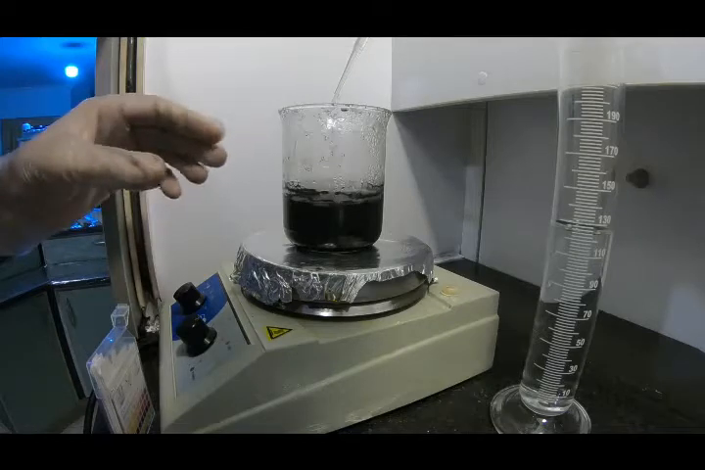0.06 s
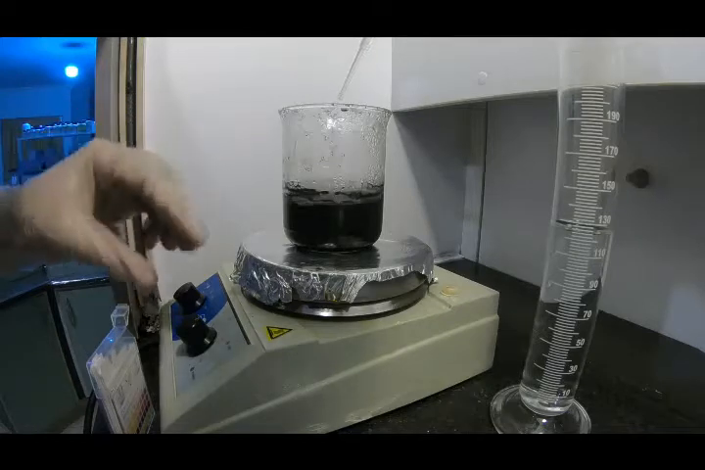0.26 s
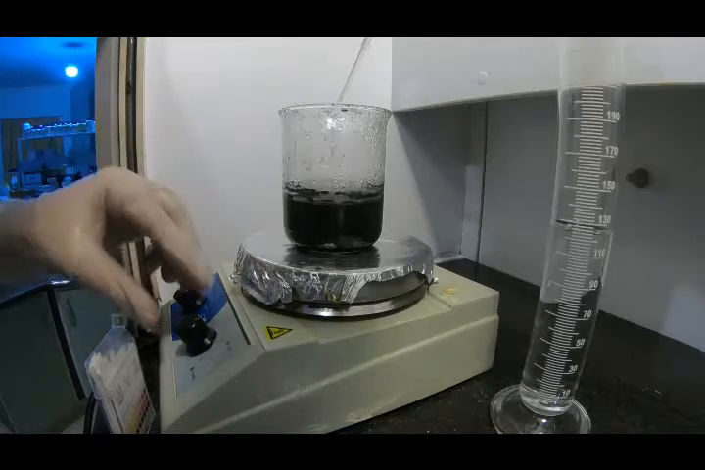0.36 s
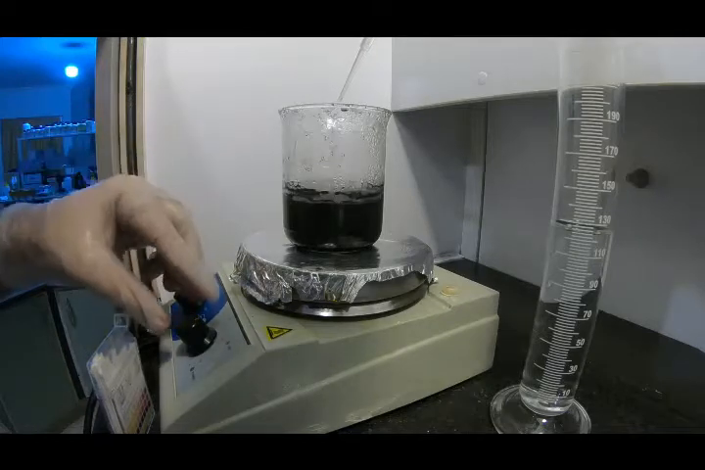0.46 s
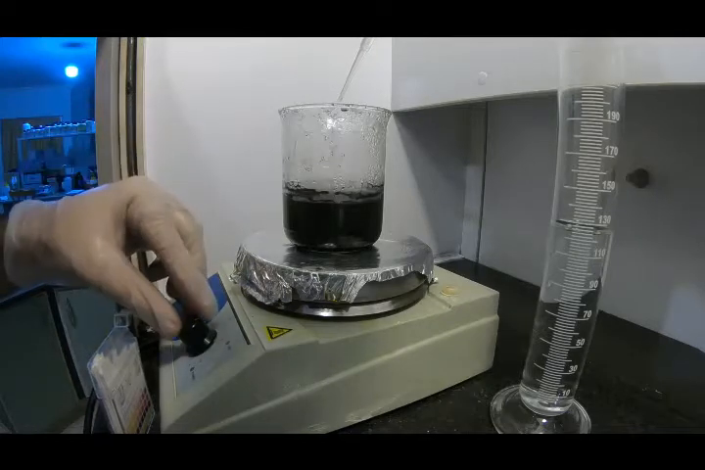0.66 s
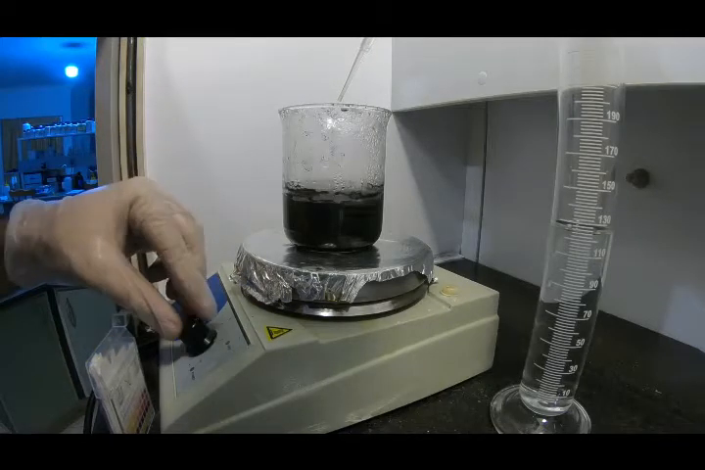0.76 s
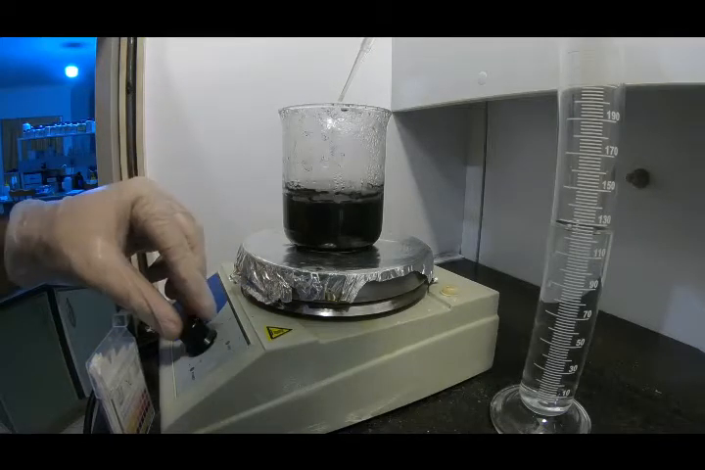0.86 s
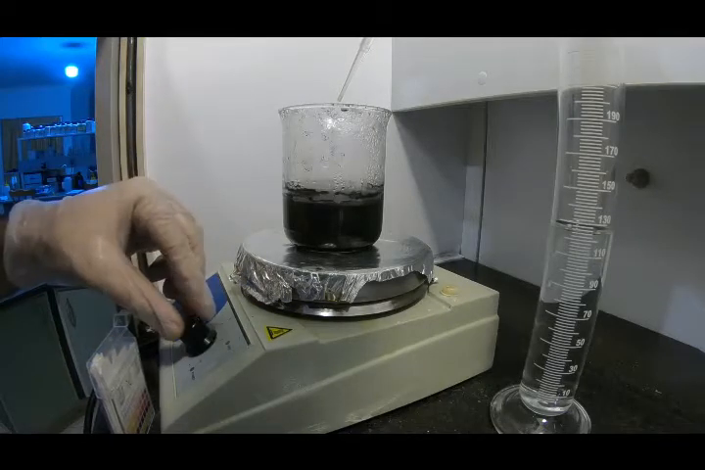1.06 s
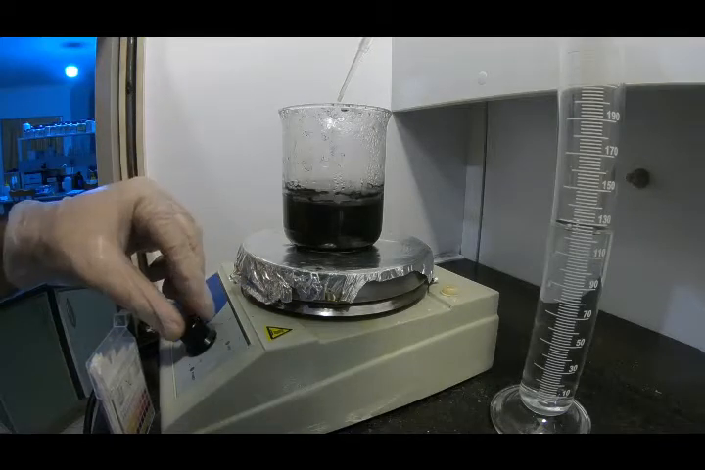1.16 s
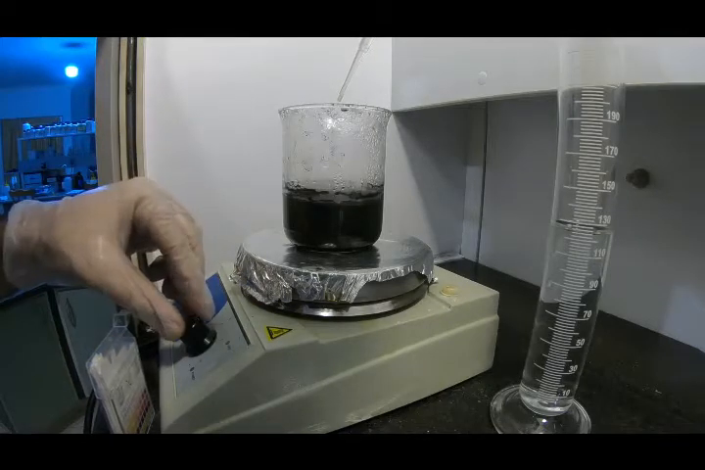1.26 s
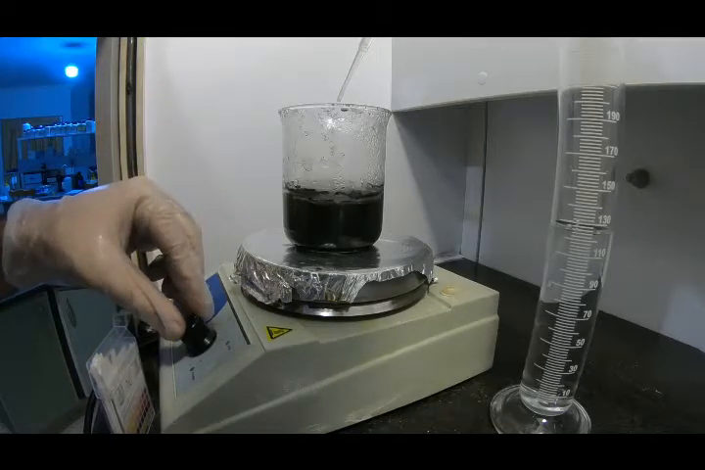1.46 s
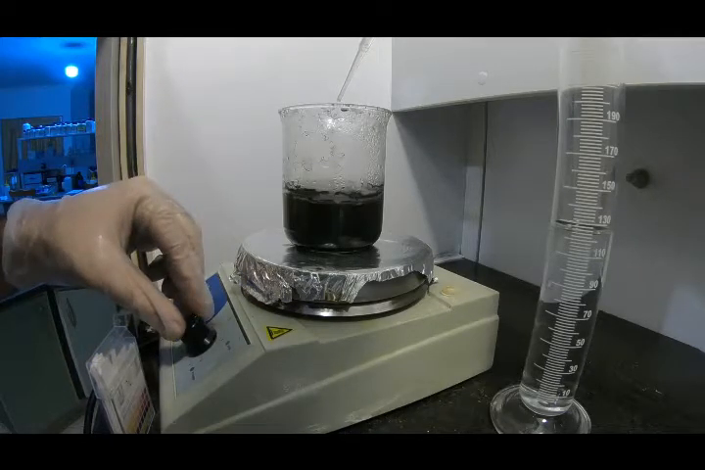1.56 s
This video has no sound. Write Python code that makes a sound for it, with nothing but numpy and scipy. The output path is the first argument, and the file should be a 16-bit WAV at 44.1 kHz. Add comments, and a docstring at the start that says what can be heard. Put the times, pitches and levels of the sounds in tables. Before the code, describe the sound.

A stirring bar clinks irregularly against a glass beaker on a hotplate stirrer. Scattered short, bright ticks open, with a stronger knock near 0.45 s and another at 0.6. After lighter taps, the loudest sharp clatter comes at 0.84-1.0 s with a brief hiss and plate rattle. From 1.13 s dull small clunks and thin high tinks fade, nearly still by 1.5 s, over faint wavering hum, rumble and close room air.

```python
"""Stirring bar tumbling in a glass beaker

A stirring bar tumbles in a glass beaker on a foil-covered stirrer hotplate: it ticks and clinks on the glass
and rattles between the blows, shaking the plate. Blows are decaying sines plus dense noise; the rattle is noise
shaped by many small touches; the plate rings as resonant noise and, when jolted, as decaying sines.
A low wavering hum, a faint steady tone, rumble and room air fill the small lab corner as coloured noise and a sine.
"""
import sys
import numpy as np
from scipy import signal
from scipy.fft import rfft, irfft, next_fast_len
from scipy.io import wavfile
from scipy.ndimage import uniform_filter1d

SR = 44100
rng = np.random.default_rng(int(sys.argv[2]) if len(sys.argv) > 2 else 0)


def file_out(sig):
    """Save sig as 16-bit WAV at sys.argv[1]."""
    # one column per channel
    cols = np.atleast_2d(sig).T
    # limit, then scale
    lim = np.clip(cols, -1, 1)
    pcm = np.round(lim * 32767).astype(np.int16)
    wavfile.write(sys.argv[1], SR, pcm)


def voltage_ratio(decibels):
    """Convert decibels (scalar or array-like) to amplitude ratios, 20 dB per decade."""
    exponent = np.asarray(decibels, float) / 20
    return 10 ** exponent


N = 70560

# modes of the beaker: pitch_hz [Hz], relative_db [dB], t60_s [s, limited and stretched in each blow]
GLASS_MODES = [(1703,-7,0.2), (2200,-6.5,0.097), (2710,4.5,0.051), (2900,4.5,0.14), (3327,2.5,0.1),
               (3500,4.5,0.067), (3803,-2,0.081), (4233,2.5,0.053), (4560,-45,0.027), (4380,-2,0.091),
               (4910,3.5,0.45), (5213,8,0.21), (5430,3,0.16), (5825,-7,0.2), (6370,-6.5,0.22),
               (6490,-1.5,0.091), (6690,5.5,0.04), (7220,-21,0.11), (7334,-1,0.058), (7670,-2.5,0.083)]
# colour of the dense unresolved modes of glass, foil and plate: pitch_hz [Hz], relative_density_db [dB per Hz]
CLATTER_COLOUR = [(710, -101), (1300, 1), (1690, -4.5), (2410, -8.5), (3280, -4.5), (3650, -11),
                  (5040, -0.5), (5490, -1), (6580, 1.5), (7650, -3.5), (8700, -17), (15500, -56)]
# plate resonances: pitch_hz [Hz], width_hz [Hz], relative_db [dB]; the steady ring squares their response
PLATE_MODES = [(804, 50, -1.5), (853.4, 41, -6.5), (920.4, 26, -1.5), (1192, 39, -3.5), (549, 93, -8)]
# left-right likeness by pitch: pitch_hz [Hz], correlation [-1 to 1]
STEREO_LIKENESS = [(60, -0.15), (140, -0.28), (640, -0.25), (1400, -0.19), (3100, 0.65), (5000, 0.4),
                   (7000, -0.13), (9000, -0.15), (15000, -0.28)]

LOWER_HZ, UPPER_HZ = 3650, 5500  # borders of the lower, middle and upper glass modes
RISE_S = 0.0025  # time constant of the onset of blows, touches, ticks and clunks
MODE_SPLIT_HZ = 52.6  # scatter of the beat rate in a blow; width of the glass resonances in the rattle
MODE_SCATTER_DB = 2.5  # how unevenly single modes are struck


def unit(x):
    """Scale to rms 1."""
    return x / np.sqrt(np.mean(x ** 2) + 1e-20)


def along(points, hz):
    """Read (Hz, value) points on a log frequency axis."""
    point_hz, value = np.transpose(points)
    return np.interp(np.log(hz + 1), np.log(point_hz + 1), value)


def level(rows):
    """Gain per sample from (s, dB) rows, gliding in dB."""
    time_s, db = np.transpose(rows)
    return voltage_ratio(np.interp(np.arange(N) / SR, time_s, db))


def colour(points):
    """Response that follows (Hz, dB) points."""
    return lambda hz: voltage_ratio(along(points, hz))


def bands(peaks):
    """Response of (Hz, width Hz, dB) resonances, summed with alternating sign."""
    def response(f):
        total = 0
        for k, (centre, width, db) in enumerate(peaks):
            damping = 1j * f * width
            total = total + (-1) ** k * voltage_ratio(db) * damping / (centre ** 2 - f ** 2 + damping)
        return total
    return response


def noise(n, response):
    """Two channels of coloured noise, rms 1, as alike as the microphone ports hear that pitch."""
    m = next_fast_len(n)
    hz = np.fft.rfftfreq(m, 1 / SR)
    turn = np.arccos(np.clip(along(STEREO_LIKENESS, hz), -1, 1)) / 2
    spectrum = rfft(rng.standard_normal((2, m))) * response(hz)
    mid, side = irfft(spectrum * [np.cos(turn), np.sin(turn)], m)[:, :n]
    return unit(np.array([mid + side, mid - side]))


def steep_noise(peaks):
    """Resonant noise with the response squared: narrower peaks, steeper skirts, dB differences doubled."""
    return noise(N, lambda hz: bands(peaks)(hz) ** 2)


def hum():
    """Low hum: resonant noise that wavers in level."""
    # course of the hum: time_s [s], level_db [dB]
    hum_level = [(0.03, -49.5), (0.132, -65.5), (0.444, -47.5), (0.734, -63.5), (0.992, -50), (1.564, -57)]
    # resonances before squaring: pitch_hz [Hz], width_hz [Hz], relative_db [dB]
    hum_band = [(144.6, 14.5, -3), (170.2, 36.7, -4.5), (201.6, 30, -8)]
    return level(hum_level) * steep_noise(hum_band)


def low_tone():
    """A faint steady sine, the same in both channels."""
    tone_hz, tone_db = 63.6, -66.5
    return voltage_ratio(tone_db) * np.sin(2 * np.pi * tone_hz * np.arange(N) / SR)


def rumble():
    """Low rumble: noise limited to the bass."""
    # course of the rumble: time_s [s], level_db [dB]
    rumble_level = [(0.0, -64), (0.61, -64), (0.992, -54), (1.6, -73)]
    # its colour: pitch_hz [Hz], relative_density_db [dB per Hz]
    rumble_colour = [(20, -10), (45, -5), (60, -4.5), (80, -1), (95, -13.5), (110, -48), (200, -120)]
    return level(rumble_level) * noise(N, colour(rumble_colour))


def room_air():
    """Room air: broad noise with most of its strength in the low range."""
    # course of the air: time_s [s], level_db [dB]
    air_level = [(0.0, -55), (0.966, -55.5), (1.6, -57.5)]
    # its colour: pitch_hz [Hz], relative_density_db [dB per Hz]
    air_colour = [(60, -49), (120, -5.5), (200, -2.5), (268, -8.5), (534, -12.5), (690, -20.5),
                  (800, -10.5), (1150, -18.5), (3750, -32.5), (6020, -21), (15500, -58.5)]
    return level(air_level) * noise(N, colour(air_colour))


def plate_ring():
    """The shaken plate rings in its low resonances, as narrow-band noise that swells and falls."""
    # course of the ring: time_s [s], level_db [dB]
    shake = [(0.0, -60), (0.106, -64.5), (0.48, -48.5), (0.516, -62), (1.03, -50.5), (1.1, -64.5),
             (1.2, -54), (1.6, -79)]
    return level(shake) * steep_noise(PLATE_MODES)


def jolts():
    """Each jolt sets the plate's low modes ringing as decaying sines."""
    # jolts of the plate: start_s [s], level_db [dB, before the mode's own level]
    jolt_rows = [(0.017, -52.5), (0.059, -57), (0.293, -51.5), (0.377, -46.5), (0.405, -68), (0.455, -50),
                 (0.598, -46.5), (0.67, -52), (0.71, -50.5), (0.762, -49), (0.825, -49), (0.895, -56),
                 (0.959, -44.5), (1.01, -52.5), (1.049, -66)]
    top_hz = 1000  # a jolt wakes only the plate modes under this
    rise_s, t60_s = 0.0018, 0.19
    out = np.zeros((2, N + SR))
    t = np.arange(SR // 4) / SR
    woken = [mode for mode in PLATE_MODES if mode[0] < top_hz]
    hz, _, mode_db = (column[:, None] for column in np.transpose(woken))
    turn = np.arccos(np.clip(along(STEREO_LIKENESS, hz), -1, 1)) / 2
    for start_s, db in jolt_rows:
        scatter, phase = rng.standard_normal((2, len(hz), 1))
        fade = voltage_ratio(db + mode_db + MODE_SCATTER_DB * scatter - 60 * t / t60_s)
        fade = fade * (1 - np.exp(-t / rise_s))
        wave = 2 * np.pi * hz * t + 9 * phase
        ring = [(fade * np.sin(wave + side * turn)).sum(0) for side in (1, -1)]
        out[:, round(start_s * SR):][:, :len(t)] += ring
    return out[:, :N]


def hit(start_s, db, t60_s):
    """Gain of one light hit: quick rise, then an exponential fall."""
    since = (np.arange(N) / SR - start_s).clip(0)
    return voltage_ratio(db - 60 * since / t60_s) * (1 - np.exp(-since / RISE_S))


def clunks():
    """Dull clunks wake a broad low ring of resonant noise."""
    # clunks: start_s [s], level_db [dB]
    clunk_rows = [(1.143, -45.5), (1.161, -46.5), (1.186, -50.5), (1.206, -53), (1.253, -49.5),
                  (1.293, -56)]
    # resonances before squaring: pitch_hz [Hz], width_hz [Hz], relative_db [dB]
    clunk_band = [(814, 125, 0), (1195, 250, 0.0052)]
    t60_s = 0.13
    return sum(hit(start_s, db, t60_s) for start_s, db in clunk_rows) * steep_noise(clunk_band)


def tinks():
    """Late light ticks wake only a thin ring of resonant noise near 6 kHz."""
    # ticks: start_s [s], level_db [dB], t60_s [s]
    tink_rows = [(1.167,-49,0.18), (1.18,-30,0.062), (1.198,-50,0.14), (1.234,-43,0.08), (1.249,-34,0.031),
                 (1.293,-52.5,0.19), (1.327,-57.5,0.23), (1.412,-50,0.15), (1.516,-47,0.13)]
    # resonances before squaring: pitch_hz [Hz], width_hz [Hz], relative_db [dB]
    tink_band = [(6150, 380, 0), (5800, 500, -3)]
    return sum(hit(*row) for row in tink_rows) * steep_noise(tink_band)


def sizzle():
    """Treble hiss that surges briefly."""
    # course of the hiss: time_s [s], level_db [dB]
    sizzle_level = [(0.0, -103), (0.48, -62.5), (0.508, -111), (0.828, -97), (0.846, -51), (1.278, -103),
                    (1.6, -86)]
    # its colour: pitch_hz [Hz], relative_density_db [dB per Hz]
    sizzle_colour = [(5000, -20), (8500, -11), (11000, -15.5), (13600, -19), (15800, -32)]
    return level(sizzle_level) * noise(N, colour(sizzle_colour))


def rattle():
    """Many small uneven touches between the blows shape noise in the clatter and the higher glass modes."""
    # course of the rattle: time_s [s], level_db [dB, of the clatter; the glass ring adds to it]
    rattle_level = [(0.0, -60.5), (0.382, -50), (0.69, -63), (0.824, -46.5), (1.04, -48.5), (1.15, -55),
                    (1.38, -63), (1.6, -86)]
    touches_per_s, scatter_db, t60_s = 220, 15, 0.045
    ring_db = -11  # glass ring against clatter
    place, strength = rng.random((int(touches_per_s * N / SR), 2)).T
    kicks = np.bincount((place * N).astype(int), voltage_ratio(scatter_db * strength), N)
    t = np.arange(SR // 5) / SR
    power_fade = voltage_ratio(-120 * t / t60_s) * (1 - np.exp(-t / RISE_S))
    # the touches add up in power; the root gives the gain
    power = signal.fftconvolve(kicks, power_fade)[:N]
    shape = unit(np.sqrt(np.abs(power)))
    peaks = [(hz, MODE_SPLIT_HZ, db) for hz, db, _ in GLASS_MODES if hz > LOWER_HZ]
    body = noise(N, colour(CLATTER_COLOUR)) + voltage_ratio(ring_db) * noise(N, bands(peaks))
    return shape * level(rattle_level) * body


def mode_group(hz):
    """0 for the lower modes, 1 for the middle, 2 for the upper."""
    return (hz > LOWER_HZ) * 1 + (hz > UPPER_HZ)


def woken(hz, favoured_hz):
    """How strongly a blow wakes each pitch: most near the one it favours."""
    width_octaves, lower_skirt_db, favoured_db = 0.16, -12, 10.5
    near = np.exp(-(np.log2(hz / favoured_hz + 1e-9) / width_octaves) ** 2)
    return np.where(mode_group(hz) == 0, near + voltage_ratio(lower_skirt_db), 1 + voltage_ratio(favoured_db) * near)


def clink(group_db, favoured_hz, stretch):
    """One blow: beating glass modes plus dense clatter, in three groups of modes, each with its level."""
    shortest_t60_s, longest_t60_s = 0.03, 0.115  # limits before the stretch
    clatter_db, clatter_t60_s = 4, 0.12  # the time is before the stretch
    beat_depth = 0.5
    mode_spread = 0.44  # share of the left-right phase angle that a mode takes
    crackle_db, crackle_s = 2.5, 0.002  # fine contacts inside a blow: unevenness, smoothing length
    t = np.arange(SR // 5) / SR
    hz, db, t60 = (column[:, None] for column in np.transpose(GLASS_MODES))
    lean, scatter, beat_rate, beat_phase, phase = rng.standard_normal((5, len(hz), 1))

    size = voltage_ratio(db) * woken(hz, favoured_hz)
    ring_t60 = np.clip(t60, shortest_t60_s, longest_t60_s) * stretch
    fade = size * voltage_ratio(MODE_SCATTER_DB * scatter - 60 * t / ring_t60)
    beat = 1 + beat_depth * np.cos(2 * np.pi * MODE_SPLIT_HZ * beat_rate * t + beat_phase)
    turn = mode_spread * np.arccos(np.clip(along(STEREO_LIKENESS, hz), -1, 1)) * np.sign(lean)
    wave = 2 * np.pi * hz * t + 9 * phase
    rings = [fade * beat * np.sin(wave + side * turn / 2) for side in (1, -1)]

    contacts = uniform_filter1d(rng.standard_normal(len(t)), size=round(crackle_s * SR))
    crackle = unit(voltage_ratio(crackle_db * unit(contacts)))
    clatter_fade = crackle * voltage_ratio(clatter_db - 60 * t / (clatter_t60_s * stretch))

    out = np.zeros((2, len(t)))
    for k, gain_db in enumerate(group_db):
        def clatter_response(f):
            in_group = uniform_filter1d(1.0 * (mode_group(f) == k), size=101)  # soft borders
            return voltage_ratio(along(CLATTER_COLOUR, f)) * woken(f, favoured_hz) * in_group

        member = mode_group(hz) == k
        ring = np.array([channel[member[:, 0]].sum(0) for channel in rings])
        ring = 2 * ring / np.linalg.norm(size[member])
        out += voltage_ratio(gain_db) / 3 * (ring + noise(len(t), clatter_response) * clatter_fade)
    return out * (1 - np.exp(-t / RISE_S))


def blows():
    """The clear ticks and clinks of the bar on the glass, each with its own pitch, balance and ring length."""
    # blows: start_s [s], upper_db [dB, relative], middle_over_upper_db [dB], lower_over_upper_db [dB],
    # favoured_hz [Hz], ring_stretch [factor, limited below]
    blow_rows = [(0.0185,-37.5,-8.5,-13.5,4780,1.23), (0.0987,-49,-3,-11,2830,3.4),
                 (0.2111,-60,-13,16,2130,0.32), (0.228,-31,-13,-22,3300,0.76),
                 (0.271,-35.5,-16,-31,2900,1.25), (0.297,-38.5,-19,-8,1660,0.58),
                 (0.368,-32,-6,-8.5,2740,0.84), (0.39,-41.5,0,-9.5,2550,2.2),
                 (0.4343,-36.5,-4,-9,3300,0.82), (0.4569,-23,-18,-17.5,1840,0.92),
                 (0.5918,-28,-9,-8.5,2950,1.23), (0.6376,-39.5,9,-0.5,3980,0.73),
                 (0.6629,-51,1,10,2730,1.63), (0.688,-53,2,16.5,2040,0.92), (0.723,-43,0.5,-7,5040,1.34),
                 (0.7503,-32.5,0,-1.5,2280,0.89), (.7765,-41,-16,-11.5,2900,1.2),
                 (0.7964,-55.5,17.5,16,3640,1.4), (.8181,-37,1,-7.5,1900,2),
                 (0.8394,-18.5,-1.5,-16.5,4510,0.83), (0.8497,-25.5,-3.5,-18,4380,0.92),
                 (0.8667,-34.5,-9,-10.5,1590,5.9), (0.9095,-32,-22,-22.5,3480,1.6),
                 (0.9524,-20,-10,-13.5,3110,0.94), (0.9962,-22,-6,-16,1790,0.83),
                 (1.0294,-40,-11,-4.5,3500,0.83), (1.0813,-46.5,-2,-8,3020,1.6),
                 (1.1256,-28.5,-10,-20.5,1770,1.46), (1.1795,-44.5,-1,2.5,3750,1.65),
                 (1.2435,-51.5,3.5,10,1815,1.2), (1.2923,-53.5,-4,10,1510,0.76),
                 (1.517,-47.5,-4.5,-16,5260,1), (1.587,-72,-6,19,2640,0.34)]
    out = np.zeros((2, N + SR))
    for start_s, db, middle_db, lower_db, favoured_hz, stretch in blow_rows:
        group_db = [db + lower_db, db + middle_db, db]
        sound = clink(group_db, favoured_hz, np.clip(stretch, 0.3, 3))
        out[:, round(start_s * SR):][:, :sound.shape[1]] += sound
    return out[:, :N]


def scene():
    """All sources together."""
    lab = hum() + low_tone() + rumble() + room_air()
    plate = plate_ring() + jolts() + clunks() + tinks()
    return lab + plate + sizzle() + rattle() + blows()


def low_pass(x):
    """Removes everything above the highest recorded frequency."""
    return signal.sosfilt(signal.butter(12, 15900, fs=SR, output="sos"), x)


def record(dry):
    """The two microphone ports lose the deepest bass and the extreme treble and differ in level by pitch."""
    # balance of the ports: pitch_hz [Hz], left_over_right_db [dB]
    left_over_right = [(50, -9), (150, -4.5), (300, 0.8), (800, -6), (1500, 1), (5000, -2.5), (9000, 2)]
    low_hz, top_hz = 37, 15750  # -6 dB point of the bass loss, sharp upper end
    m = next_fast_len(N + 8192)
    hz = np.fft.rfftfreq(m, 1 / SR)
    half_db = along(left_over_right, hz) / 2
    response = hz ** 2 / (hz ** 2 + low_hz ** 2) * (hz < top_hz) * voltage_ratio([half_db, -half_db])
    mix = irfft(rfft(dry, m) * response, m)[:, :N]
    return low_pass(mix)


dry = scene()
out = record(dry)
file_out(out)
```